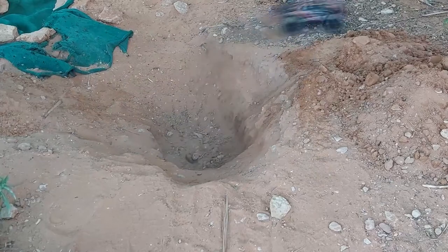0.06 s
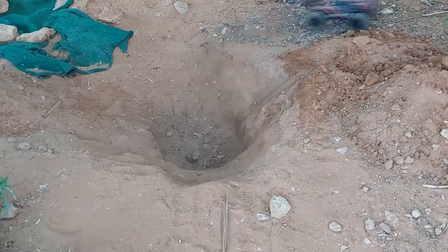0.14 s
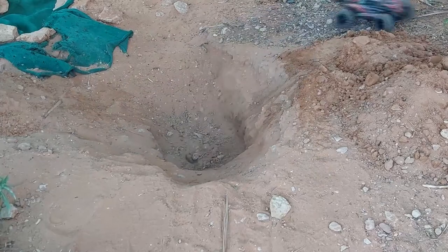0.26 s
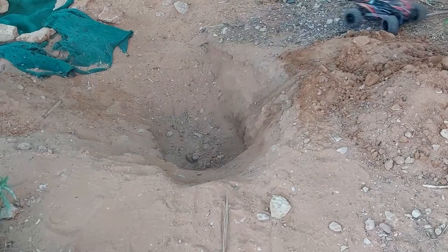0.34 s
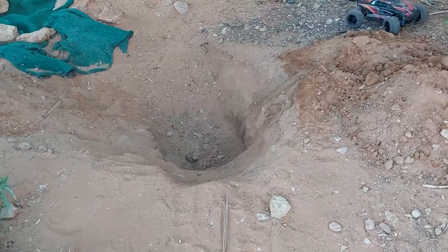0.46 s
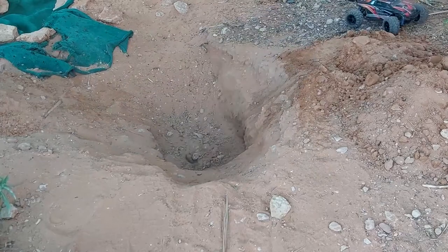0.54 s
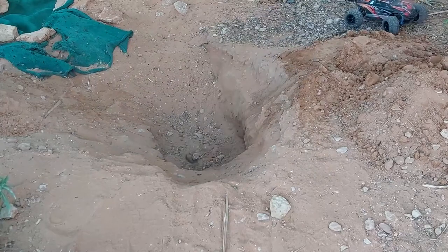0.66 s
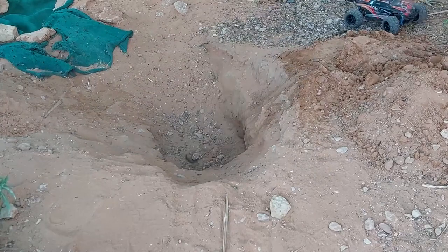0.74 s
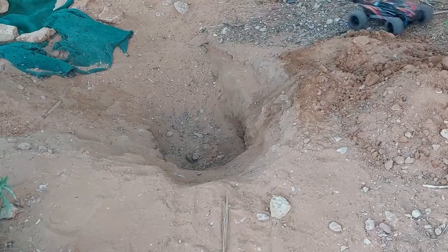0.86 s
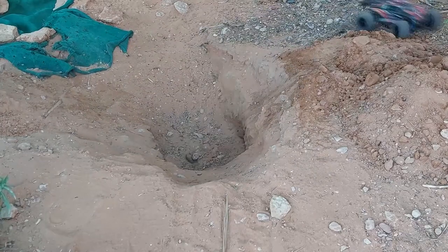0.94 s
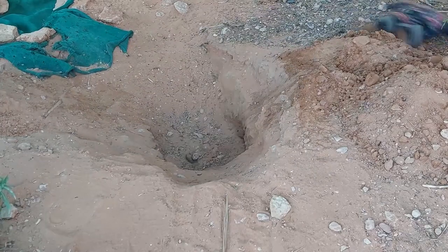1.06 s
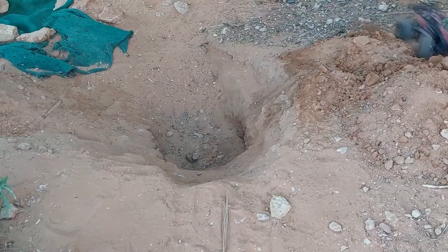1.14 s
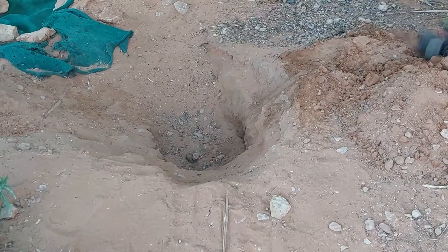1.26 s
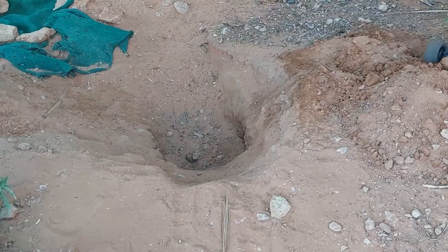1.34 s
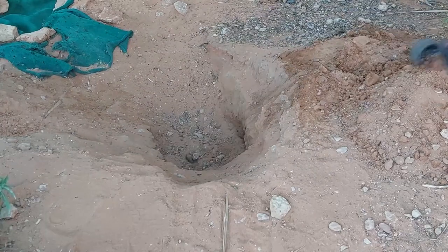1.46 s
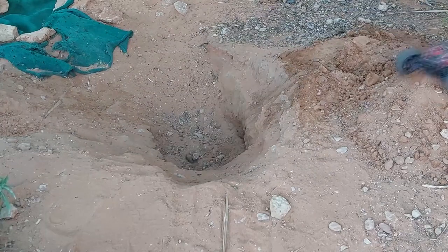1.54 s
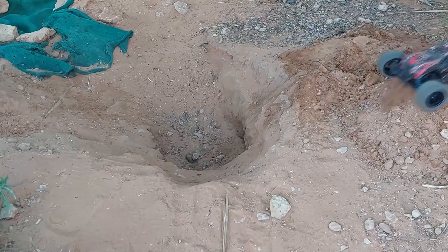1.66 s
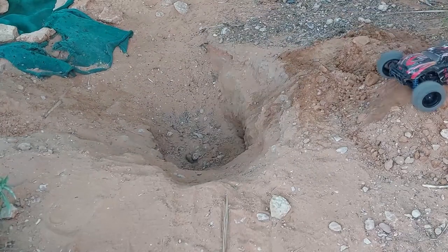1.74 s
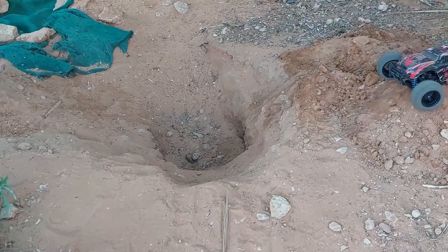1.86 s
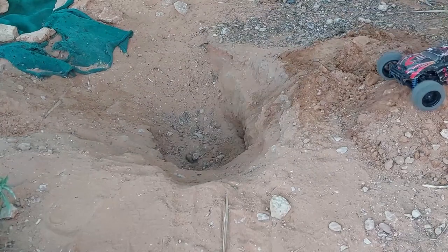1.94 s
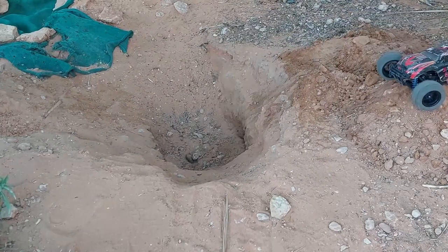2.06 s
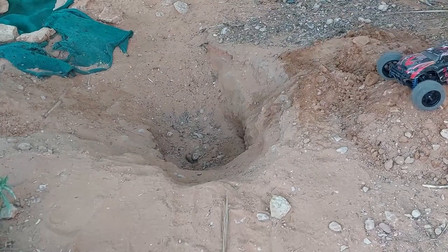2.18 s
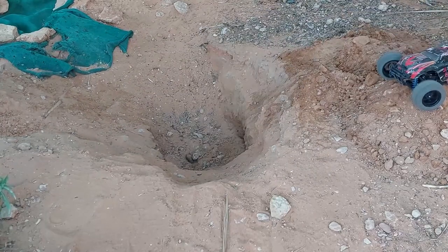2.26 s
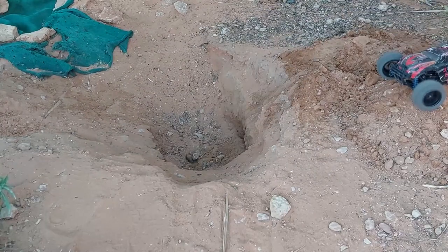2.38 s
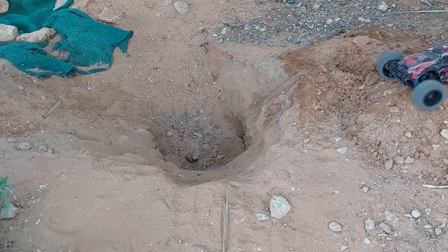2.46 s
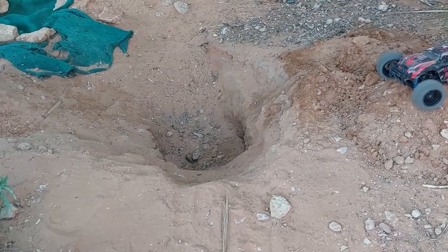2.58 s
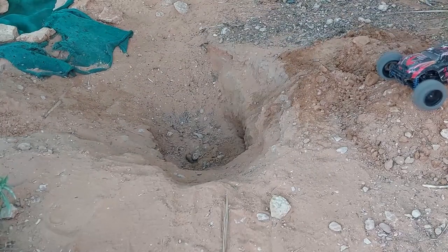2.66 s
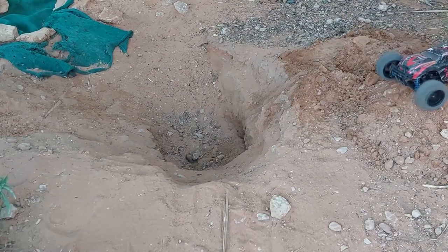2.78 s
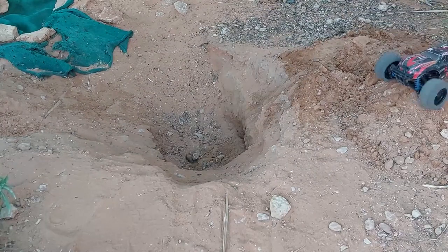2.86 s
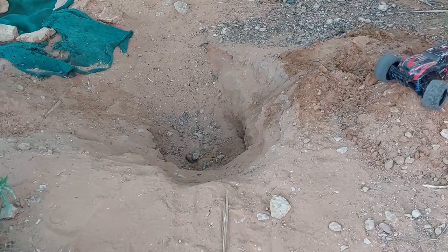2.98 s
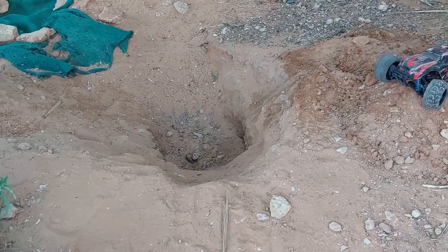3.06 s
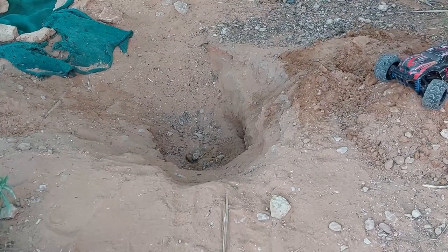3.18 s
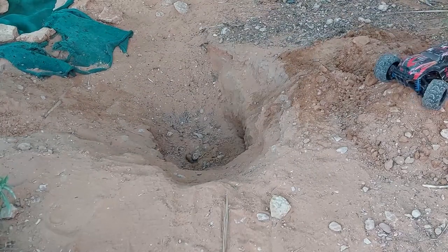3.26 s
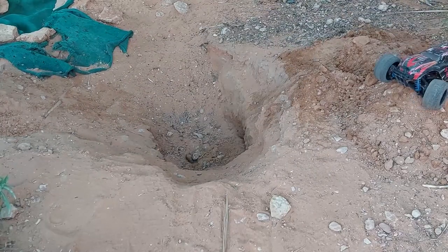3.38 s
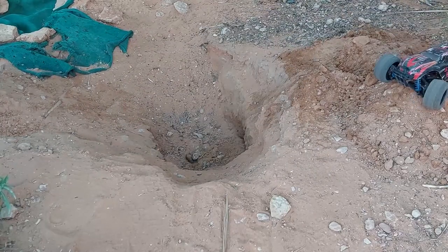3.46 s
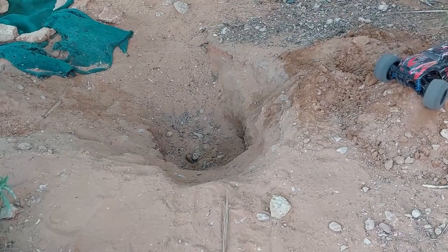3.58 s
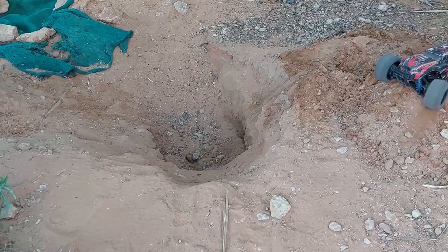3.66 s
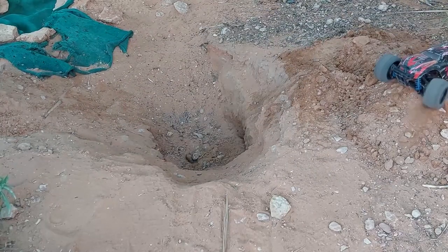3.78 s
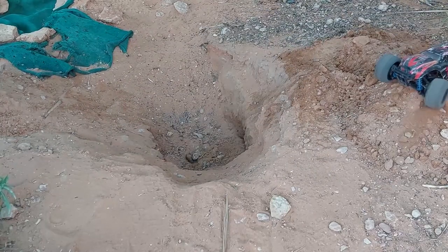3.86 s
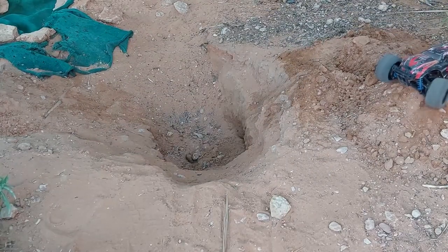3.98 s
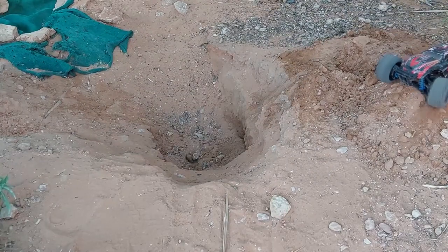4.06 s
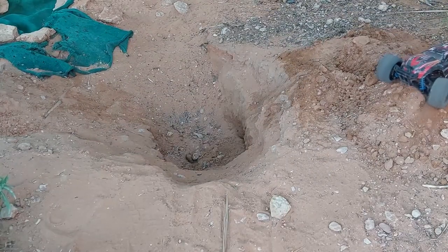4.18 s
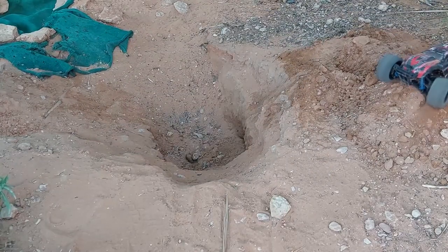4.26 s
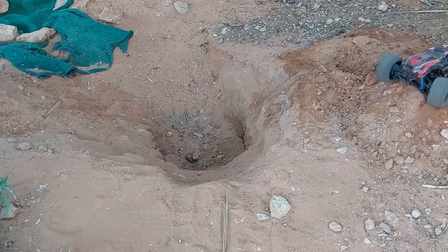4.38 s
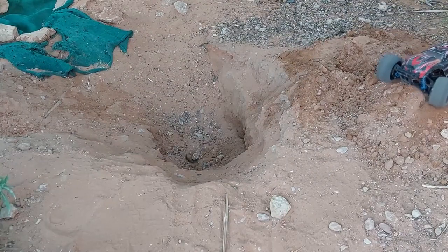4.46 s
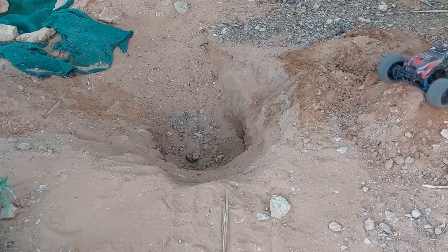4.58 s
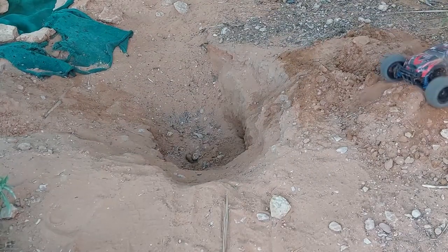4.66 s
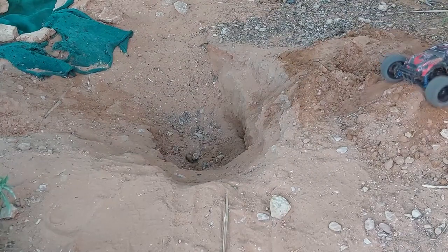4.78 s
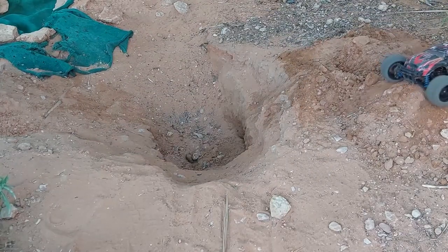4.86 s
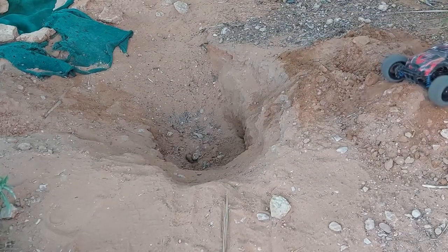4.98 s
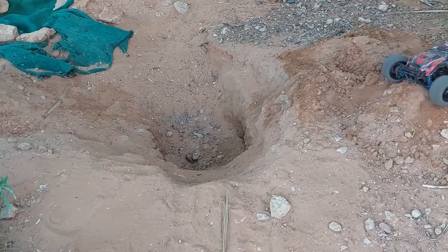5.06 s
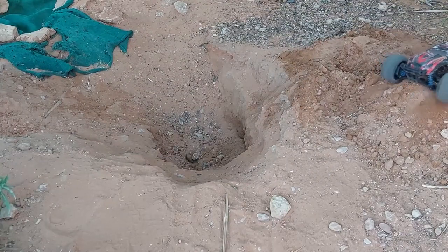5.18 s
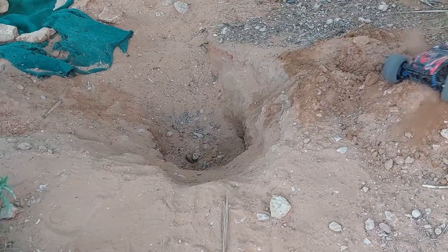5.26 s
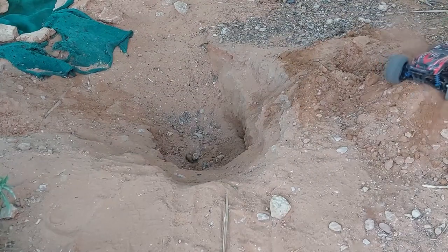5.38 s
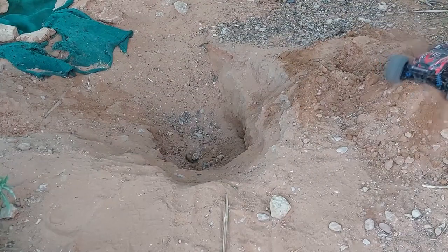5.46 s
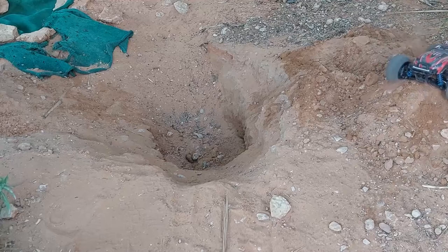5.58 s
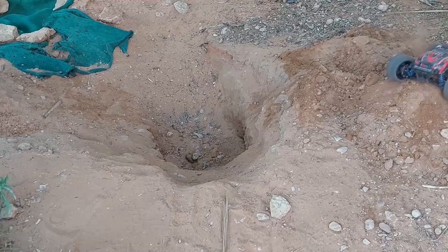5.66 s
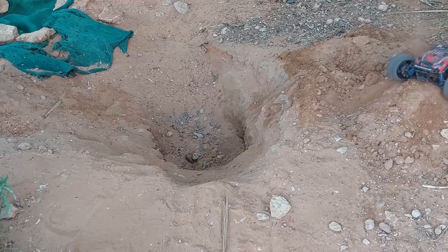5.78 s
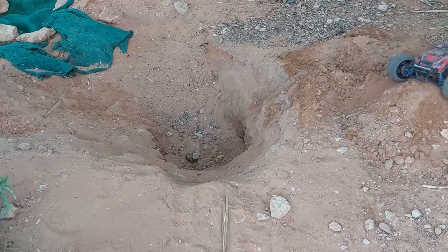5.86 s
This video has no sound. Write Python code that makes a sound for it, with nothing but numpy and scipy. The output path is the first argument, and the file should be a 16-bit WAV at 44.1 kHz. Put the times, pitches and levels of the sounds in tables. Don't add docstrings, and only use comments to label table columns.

```python
import sys
import numpy as np
from scipy import signal
from scipy.fft import rfft, irfft, next_fast_len
from scipy.io import wavfile
from scipy.ndimage import uniform_filter1d, map_coordinates

SR = 44100
rng = np.random.default_rng(int(sys.argv[2]) if len(sys.argv) > 2 else 0)


def file_out(sig):
    cols = np.atleast_2d(sig).T
    lim = np.clip(cols, -1, 1)
    pcm = np.round(lim * 32767).astype(np.int16)
    wavfile.write(sys.argv[1], SR, pcm)


def gain_from_decibels(decibels):
    exponent = np.asarray(decibels, float) / 20
    return 10 ** exponent


N = 261513
TIME = np.arange(N) / SR
SIZE = next_fast_len(N + 4096)
BINS = np.maximum(np.fft.rfftfreq(SIZE, 1 / SR), 1)


def columns(table):
    s, *rest = np.transpose(table)
    return [np.interp(TIME, s, column) for column in rest]


def across(points):
    hz, value = np.transpose(points)
    return np.interp(np.log(BINS), np.log(hz), value)


def colour(x, points):
    cepstrum = irfft(across(points) * np.log(10) / 20, SIZE)
    cepstrum[1:SIZE // 2] *= 2
    cepstrum[SIZE // 2 + 1:] = 0
    response = np.exp(rfft(cepstrum))
    return irfft(rfft(x, SIZE) * response, SIZE)[..., :N]


def unit(x):
    return x / np.sqrt(np.mean(x ** 2))


def walk(rate):
    hold = max(int(SR / rate), 65)
    levels = rng.standard_normal(N // 64)[np.arange(N) // hold]
    return unit(uniform_filter1d(uniform_filter1d(levels, hold), hold))


def blur(width_hz):
    return walk(width_hz) + 1j * walk(width_hz)


def ports(common, left, right, alike):
    share = np.clip(across(alike), 0, 1)
    own = rfft(np.array([left, right]), SIZE)
    return irfft(np.sqrt(share) * rfft(common, SIZE) + np.sqrt(1 - share) * own, SIZE)[:, :N]


# (frequency [Hz], share [0-1])
HUSH_ALIKE = [(100, 0.94), (250, 1), (500, 0.13), (1200, 0.071), (4000, .05)]
# (frequency [Hz], level [dB])
HUSH = [(22, -54), (33, -29), (42, -1), (75, -1.5), (145, -3.5), (200, -6.5), (300, -9.5), (500, -19),
        (1000, -16.5), (1400, -23), (2000, -43), (3200, -55), (5500, -41.5), (9000, -46.5), (15000, -46.5)]
# (time [s], level [dB])
BREEZE = [
    (.5, 3),
    (.65, -4),
    (.8, -1),
    (.9, 0.1),
    (3.2, 2.5),
    (3.3, 6),
    (3.42, 0.1),
    (3.5, 4),
]


def hush():
    air = unit(colour(ports(*rng.standard_normal((3, N)), HUSH_ALIKE), HUSH))
    treble = signal.sosfiltfilt(signal.butter(2, 3500, "high", fs=SR, output="sos"), air)
    breeze = gain_from_decibels(columns(BREEZE)[0] + 1.0 * walk(9.7))
    return gain_from_decibels(-50.5 + 1.6 * walk(0.99)) * (air + (breeze - 1) * treble)


# (time [s], level [dB], upper tone re level [dB])
DRONE = [(0, -45.5, -3.5), (.62, -45, 2), (.78, -38.5, -9), (.92, -58, -13), (1.07, -44, -3),
         (1.23, -42, -10), (1.4, -40, -4), (1.55, -36.5, -12), (1.72, -55, 2), (1.9, -43, -8),
         (2.5, -46.5, -4), (3.0, -56.5, 9), (3.34, -67, -11), (3.7, -65, 5), (3.85, -45, -3),
         (4.38, -62, -1), (4.5, -46, -13), (5.93, -42.5, -11)]


def drone():
    db, upper_db = columns(DRONE)
    phase = 2j * np.pi * np.cumsum(39 + 1.4 * walk(4)) / SR
    first, low, upper, fourth = (np.exp(k * phase) * (2 + blur(24)) for k in (1, 1.93, 3, 3.65))
    tones = gain_from_decibels(-6.0) * first + low + gain_from_decibels(upper_db + 5.0) * (upper + gain_from_decibels(-4.5) * fourth)
    return gain_from_decibels(db - 12) * tones.real


# (time [s], tooth rate [Hz], motor effort [dB], digging [dB], grip [0-1])
ARRIVE = [(0, 4150, -40.5, -38, 0.45), (.07, 4150, -42, -37, .3), (.13, 4750, -40.5, -38, 0.5),
          (.18, 4154, -39.5, -38.5, 0.4), (.22, 4030, -49, -44, 0.3), (.3, 3490, -60, -45.5, 0.15),
          (.4, 3461, -74, -51, 0.19), (.46, 3500, -75, -59, .1), (.53, 3500, -77, -70, 0.06),
          (.6, 3194, -88, -75, .05), (.72, 2595, -100, -76, 0.03)]
NUDGE = [
    (.8, 2500, -95, -76, .03),
    (.83, 2500, -78, -65, .03),
    (.94, 2460, -72, -61.5, 0.032),
    (.99, 2550, -62, -50, .05),
    (1.03, 2630, -47, -42, 0.3),
    (1.14, 3500, -43.5, -45, 0.53),
    (1.2, 3600, -42, -45, 0.39),
    (1.279, 3540, -41.5, -41.5, 0.35),
    (1.34, 2770, -44.5, -44.5, 0.67),
]
CLIMB = [(1.38, 2950, -40.5, -43, 0.59), (1.42, 3300, -38.5, -47, 0.62), (1.445, 3750, -36.5, -48.5, 0.88),
         (1.462, 3450, -40, -43.5, .7), (1.484, 3450, -35.5, -42.5, 0.94), (1.52, 3550, -40, -42.5, 0.4),
         (1.55, 3383, -36, -49, 1), (1.567, 3850, -33.5, -44, 0.84), (1.59, 3870, -37, -42.5, 0.94),
         (1.63, 4250, -37, -41, 0.15), (1.68, 4390, -34.5, -39.5, 0.87), (1.7, 4770, -35, -42.5, 0.86),
         (1.73, 4790, -37, -38.5, 0.76), (1.75, 5040, -38, -36.5, 0.93), (1.775, 5300, -42.5, -35.5, 0.97),
         (1.81, 5380, -40, -38, 0.84), (1.84, 5470, -45, -36.5, 0.55), (1.89, 5580, -41, -40, 0.51),
         (1.915, 4600, -45, -39.5, 0.89), (1.951, 4530, -43.5, -42, 0.54), (2.01, 3720, -42.5, -49, 0.3),
         (2.11, 2980, -47, -47.5, 0.2)]
DIG = [(2.219, 2770, -56, -52, 0.21), (2.3, 3000, -51, -49, .1), (2.381, 3499, -39.5, -46, 0.27),
       (2.41, 3850, -40.5, -43.5, 0.66), (2.429, 4500, -41.5, -42, 0.99), (2.455, 4700, -40.5, -39, 1),
       (2.475, 5250, -40.5, -40, 0.99), (2.512, 5210, -43, -35.5, 0.45), (2.68, 5000, -42, -35.5, 0.6),
       (2.8, 5050, -39.5, -35.5, 0.53), (2.96, 4950, -47.5, -34.5, 0.71), (3.01, 5000, -42, -36.5, 0.765),
       (3.027, 4250, -42, -42, 1), (3.045, 4300, -48.5, -40.5, 0.6), (3.066, 3720, -43.5, -44, 0.95),
       (3.1, 3130, -41.5, -40, 0.26), (3.187, 2510, -68, -59, 0.087)]
CHURN = [(3.349, 2850, -79, -76, 0.064), (3.45, 3100, -96, -72.5, 0.065), (3.65, 4190, -43.5, -42.5, 0.3),
         (3.7, 4550, -40.5, -40, 0.67), (3.75, 4710, -44, -39, 0.61), (3.79, 5250, -44, -37.5, 0.49),
         (3.949, 5250, -45, -35.5, 0.69), (4.178, 5300, -43.5, -38, 0.75), (4.3, 5190, -43, -35.5, 0.46),
         (4.6, 5280, -43.5, -36.5, 0.77), (4.82, 5030, -43, -37, 0.78), (4.899, 5150, -45.5, -35.5, 0.61),
         (5.098, 5250, -40, -36, 0.44), (5.25, 5270, -44.5, -37, 0.9), (5.6, 5276, -44, -37, 0.75),
         (5.93, 5275, -44.5, -36, 0.75)]
BURSTS = [ARRIVE, NUDGE, CLIMB, DIG, CHURN]
LOOSE_DB = [-11, -4, -6, -5, -8]


def drive():
    return columns([(*row, db) for burst, db in zip(BURSTS, LOOSE_DB) for row in burst])


# (frequency [Hz], share [0-1])
ALIKE = [(100, 0.8), (700, 0.85), (2000, 0.88), (5000, 0.31), (8000, 0.12), (13000, 0)]


def grains(points, rate, spread_db, smear_s, count):
    hz = np.log(np.array(points)[:, 0])
    place = np.clip((np.log(BINS) - hz[0]) / (hz[-1] - hz[0]), 0, 1) * (count - 1)
    out = 0
    for zone in range(count):
        struck = rng.random(N) < rate / count / SR
        size = struck * gain_from_decibels(spread_db * rng.exponential(size=N).clip(0, 4))
        swell = np.sqrt(signal.lfilter([1], [1, -np.exp(-1 / (smear_s * SR))], size ** 2))
        fade = np.cos(np.pi / 2 * np.clip(place - zone, -1, 1))
        out = out + fade * rfft(swell * rng.standard_normal((3, N)), SIZE)
    return unit(colour(ports(*irfft(out, SIZE)[:, :N], ALIKE), points))


def wobbly(hz, slip, width_hz, throb_db):
    turn = np.cumsum(hz / 110 * (1 + .3 * walk(25))) / SR
    jump, size = rng.standard_normal((2, N // 64))[:, turn.astype(int)]
    sag = 1 + slip * (1 - 2 * (turn % 1) + .28 * jump)
    tone = np.exp(2j * np.pi * np.cumsum(hz * sag) / SR)
    throb = uniform_filter1d(gain_from_decibels(throb_db * (size - np.cos(2 * np.pi * turn))), size=150)
    return unit(ports(*(throb * (tone * blur(width_hz)).real for _ in range(3)), ALIKE))


# (frequency [Hz], level [dB])
HOUSING = [(2500, -9), (3600, -6), (4500, -2), (5200, -3.5), (5600, -18), (5900, -11.5), (7000, -21)]


def gearbox():
    hz, effort_db, _, grip, _ = drive()
    grip = grip.clip(0, 1)
    slip_loose, slip_gripped = .085, .024
    loose_db, gripped_db = -16, 3.5
    slip = slip_loose + (slip_gripped - slip_loose) * grip
    whine_db = loose_db + (gripped_db - loose_db) * grip
    first = wobbly(hz, slip, width_hz=330, throb_db=1.4)
    side = wobbly(.89 * hz, slip, width_hz=400, throb_db=3.5)
    second = wobbly(.56 * hz, slip, width_hz=400, throb_db=3)
    rattle = grains(HOUSING, rate=900, spread_db=2.5, smear_s=.004, count=3)
    side_db = -4.5 + 60 * np.log2(np.minimum(hz / 5150, 1))
    whine = first + gain_from_decibels(side_db) * side + gain_from_decibels(-14.0) * second
    return gain_from_decibels(effort_db) * (gain_from_decibels(whine_db) * whine + gain_from_decibels(-3.5 + walk(18)) * rattle)


# (frequency [Hz], level [dB])
SOIL = [(150, -32), (300, -8.5), (480, 0.5), (900, -0.5), (1050, -5.5), (1180, -1.5), (1350, -6.5),
        (1700, -3.5), (2100, -6.5), (2800, -7), (3600, -17.5), (6000, -23)]
THUD = [(25, -42), (45, -17), (90, 3.5), (200, -4.5), (330, -3), (480, -2.5), (900, -51.5)]
GRIT = [(2500, 2.5), (5500, 3.5), (7000, -2.5), (8400, 2), (9300, -4.5), (11000, -7.5), (13500, -6.5),
        (14050, -8), (14200, -2), (14400, -15), (16500, -28)]


def tyres():
    hz, _, scrabble_db, _, loose_db = drive()
    grit_db = loose_db + 27.5 * np.log2(np.minimum(hz / 3740, 1))
    thud_db = -47 + 0.51 * (scrabble_db + 35) - scrabble_db
    bite = walk(25.09)
    scrabble = grains(SOIL, rate=1500, spread_db=2, smear_s=.004, count=4)
    thud = grains(THUD, rate=300, spread_db=1.5, smear_s=.005, count=2)
    grit = grains(GRIT, rate=2500, spread_db=3, smear_s=.0015, count=2)
    scrabble = scrabble * gain_from_decibels(1.03 * bite)
    thud = thud * gain_from_decibels(thud_db + .5 * bite)
    grit = grit * gain_from_decibels(grit_db + 4.5 + 0.99 * walk(9))
    return gain_from_decibels(scrabble_db) * (scrabble + thud + grit)


# (time [s], length [s], start pitch
# [Hz], end pitch [Hz], level [dB])
SQUEAKS = [(0, .09, 1900, 2050, -44), (.14, .03, 2200, 2050, -45), (1.15, .04, 1980, 1980, -45),
           (1.555, .135, 1940, 2000, -41.5), (1.76, .14, 2800, 3050, -45), (2.03, .04, 3050, 3000, -50),
           (2.17, .03, 1620, 1600, -52), (2.32, .06, 2600, 2620, -46), (2.49, .09, 3000, 3050, -43),
           (3.6, .1, 1550, 2150, -54), (1.515, .07, 4450, 5000, -46), (1.61, .08, 3900, 4020, -44.5),
           (2.385, .04, 1700, 1850, -46), (1.99, .03, 1700, 1700, -48), (5.63, .03, 3280, 3280, -45)]


def squeaks():
    out = np.zeros(N)
    rough = (1 + 1.2 * blur(260)) * gain_from_decibels(2 * walk(50))
    for s, length, hz0, hz1, db in SQUEAKS:
        u = np.clip((TIME - s) / length, 0, 1)
        tone = np.exp(2j * np.pi * np.cumsum(hz0 + (hz1 - hz0) * u) / SR)
        swell = np.sqrt(np.sin(np.pi * u).clip(0))
        out += gain_from_decibels(db) * swell * (rough * tone).real
    return np.array([out, out])


def hits(table, cycles, tail_s, tail_db, rise_s=0, sag_per_s=0):
    out, t = np.zeros((2, N + 2048)), np.arange(2048) / SR
    noise = rng.standard_normal((len(table), 2, 2048))
    for (s, db, hz), hiss in zip(table, noise):
        sag = 1 + sag_per_s * (.004 - t / 2)
        ring = -np.sin(2 * np.pi * hz * t * sag) * np.exp(-t * hz / cycles)
        ring = ring * (1 - np.exp(-t / (rise_s + 1e-5)))
        clatter = signal.fftconvolve(hiss * np.exp(-t / tail_s), ring[None], axes=1)[:, :2048]
        clatter = clatter / np.abs(clatter).max()
        at = int((s + .001) * SR)
        out[:, at:at + 2048] += gain_from_decibels(db) * (ring + gain_from_decibels(tail_db) * clatter)
    return out[:, :N]


# (time [s], peak level [dB], ring [Hz])
TICKS = [(0.0238, -28, 8700), (0.0834, -30, 8360), (0.325, -37, 8500), (0.4319, -53, 8400),
         (0.5043, -52, 8400), (.5043, -55, 6000), (.456, -58, 8200), (.285, -48, 8500), (.353, -51, 10940),
         (1.0101, -42, 8000), (1.1184, -35, 7860), (1.3194, -37, 13100), (1.6205, -32, 9300),
         (1.661, -35, 6560), (1.7558, -26, 8400), (1.9131, -32, 8660), (2.1575, -46, 12440),
         (2.2416, -52, 12500), (2.288, -46, 8600), (2.381, -41, 8970), (2.5026, -26.5, 8900),
         (2.5411, -28, 8200), (2.5623, -17, 8270), (2.7, -27, 7570), (2.9901, -29, 12970),
         (3.2074, -47, 5200), (3.2078, -44, 9900), (3.166, -55, 12000), (3.4117, -61, 9500),
         (3.489, -60, 9000), (3.252, -59, 6000), (3.2866, -54, 7060), (3.934, -28.5, 7870),
         (4.0257, -28, 8410), (4.0642, -26, 8340), (4.2847, -25.5, 8160), (4.3789, -25.5, 8400),
         (4.4855, -25, 8450), (4.554, -23.5, 8360), (4.8585, -28, 8885), (5.669, -40, 13840),
         (.404, -54, 6060), (2.83, -33, 8600), (2.875, -33, 8660)]


def pebble_ticks():
    return hits(TICKS, cycles=3.4, tail_s=.003, tail_db=1)


# (time [s], peak level [dB], ring [Hz])
DRUMS = [(0.036, -32, 715), (0.071, -30, 886), (0.136, -35, 633), (0.16, -35, 650), (1.021, -36, 776),
         (1.246, -44, 408), (1.286, -33.5, 393), (1.314, -34.5, 490), (1.436, -34.5, 480),
         (1.491, -45, 762), (1.565, -37, 514), (1.653, -33, 597), (1.72, -39, 680), (1.906, -40, 756),
         (2.44, -36, 527), (2.487, -33, 459), (2.505, -33, 489), (2.523, -35, 657), (2.568, -39, 518),
         (2.63, -37, 525), (2.655, -32, 503), (2.742, -43, 603), (2.817, -29, 762), (2.85, -31, 520),
         (2.883, -28, 688), (2.9, -38, 718), (2.926, -33, 390.5), (3.012, -32.5, 588), (3.681, -47, 461),
         (3.911, -28, 528), (4.137, -33, 571), (4.189, -42, 1200), (4.486, -30, 481), (4.58, -35, 820),
         (4.6, -31, 421), (4.656, -35, 483), (4.795, -26.5, 918), (4.813, -26.5, 780), (4.919, -31, 662),
         (5.062, -37, 686), (5.1, -30, 607), (5.249, -23, 905), (5.261, -27, 690), (5.329, -43, 590),
         (5.372, -47, 557), (5.441, -50, 596), (5.501, -37, 481), (5.63, -30, 717), (5.695, -36, 442),
         (5.757, -27, 864), (5.775, -27, 716), (5.807, -29, 930), (5.865, -33, 974), (5.7, -31.5, 269),
         (5.74, -25, 1465), (5.79, -39, 1495), (4.4, -37, 1145), (4.5, -27, 1170), (2.56, -51, 246)]


def shell_drums():
    return hits(DRUMS, cycles=3.6, tail_s=0.0063, tail_db=-7.0)


# (time [s], peak level [dB], ring [Hz])
KNOCKS = [(0.105, -23.5, 1030), (0.194, -27.5, 640), (0.23, -29, 980), (0.291, -38, 970), (1.09, -30, 796),
          (1.118, -29.5, 870), (1.208, -34, 454), (1.2865, -23.5, 1010), (1.689, -31, 484),
          (1.755, -28, 690), (2.557, -26.5, 519), (2.523, -30, 987), (2.622, -30, 1000), (2.711, -14, 1114),
          (2.756, -25, 966), (2.839, -20, 1088), (2.967, -25.5, 879), (3.097, -29.5, 1450),
          (3.946, -41, 571), (4.348, -33, 600), (4.396, -23.5, 1006), (4.471, -39, 496),
          (4.503, -28.5, 730), (4.716, -32.5, 549.5), (4.95, -29, 911), (5.141, -24, 860),
          (5.212, -30, 640), (5.235, -20, 744), (5.484, -30, 937), (5.834, -36, 498)]


def chassis_knocks():
    return gain_from_decibels(3) * hits(KNOCKS, cycles=1.5, tail_s=.012, tail_db=-6)


# (time [s], peak level [dB], ring [Hz])
CATCHES = [(2, -34, 4700), (1.6801, -34, 4680), (1.9021, -27, 5070), (1.9362, -29.5, 4610),
           (2.593, -33, 4410), (3.7364, -28.5, 4870), (3.9758, -28.5, 4800), (4.0247, -31, 4900),
           (4.1006, -30, 4590), (4.8, -30, 5150), (5, -28, 4530), (4.4064, -32, 4800), (4.595, -26, 4600),
           (4.62, -26, 5200), (4.5, -27, 5480), (5.2165, -32, 4700), (5.2705, -28, 5400),
           (5.3533, -26, 5070), (5.3818, -29, 5300), (5.4032, -28.5, 5170), (5.461, -31, 5650),
           (5.513, -25.5, 5550), (5.5677, -21, 5300), (5.604, -27, 5340), (5.668, -22, 5320),
           (5.695, -30, 5500), (5.7823, -23, 5240), (5.8267, -26, 5220), (5.8486, -24, 5100),
           (5.894, -29, 5400), (5.193, -31, 4900), (5.31, -31, 4850), (5.9, -31, 5500), (3.705, -29, 4550),
           (5.917, -24, 5140), (5.72, -32, 5430), (5.535, -29, 4500), (5.415, -21, 5100),
           (2.905, -36, 4500), (2.3, -34, 4950), (2.785, -39, 4900), (3.98, -30, 4670), (4.215, -33, 5320),
           (4.685, -32, 4750), (4.775, -35, 5100), (4.815, -33, 4800), (2.989, -32, 6220),
           (3.165, -56, 4900), (3.2074, -60, 4400), (2.1824, -44, 4910), (2.2882, -49, 4670),
           (2.3366, -43, 5050), (2.3805, -37, 5270), (2.16, -46, 4400), (2.12, -44, 5200),
           (2.243, -50, 4670), (3.5334, -57, 4900)]


def gear_catches():
    return hits(CATCHES, cycles=21.4, tail_s=0.0081, tail_db=-7.0, rise_s=0.00074, sag_per_s=9.4)


# (time [s], peak level [dB], ring [Hz])
GLINTS = [(2.157, -45, 14100), (2.2413, -53, 14200), (2.99, -34, 14200), (2.5057, -44, 14340),
          (2.601, -38, 14750), (2.7556, -39, 13900), (2.9224, -41, 14440), (2.9572, -40.5, 14300),
          (3.8666, -39, 14230), (4.3094, -41, 14250), (4.8524, -38, 14270), (5.1771, -42, 14250),
          (5.5528, -40, 14220)]


def high_glints():
    return gain_from_decibels(-1.0) * hits(GLINTS, cycles=40, tail_s=.006, tail_db=5.5)


# (time [s], lag [samples])
LEFT_LAG = [
    (0, 1.5),
    (.22, 3.2),
    (.34, 5),
    (.9, 6.3),
    (1.3, 8),
]


def scene():
    truck = gearbox() + tyres() + squeaks() + pebble_ticks() + shell_drums()
    truck = truck + chassis_knocks() + gear_catches() + high_glints()
    truck[0] = map_coordinates(truck[0], [np.arange(N) - columns(LEFT_LAG)[0]], mode="mirror")
    return truck + drone() + hush()


def top_cut(x):
    return signal.sosfilt(signal.butter(12, 15830, fs=SR, output="sos"), x)


# (frequency [Hz], level re right [dB])
LEFT_PORT = [(40, -11), (110, -6.5), (200, -3), (700, -3), (4400, -1.74), (15000, -3)]


def record(dry):
    pair = np.array([colour(dry[0], LEFT_PORT), dry[1]])
    pair = signal.sosfilt(signal.ellip(10, .2, 70, 15750, fs=SR, output="sos"), pair)
    return top_cut(pair)


dry = scene()
out = record(dry)
file_out(out)
```